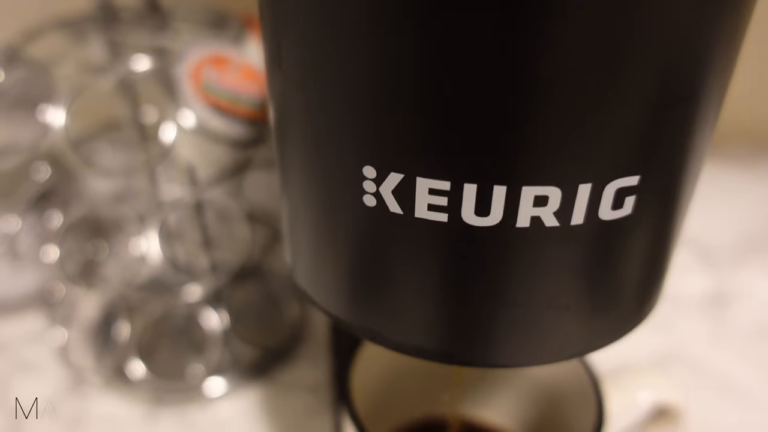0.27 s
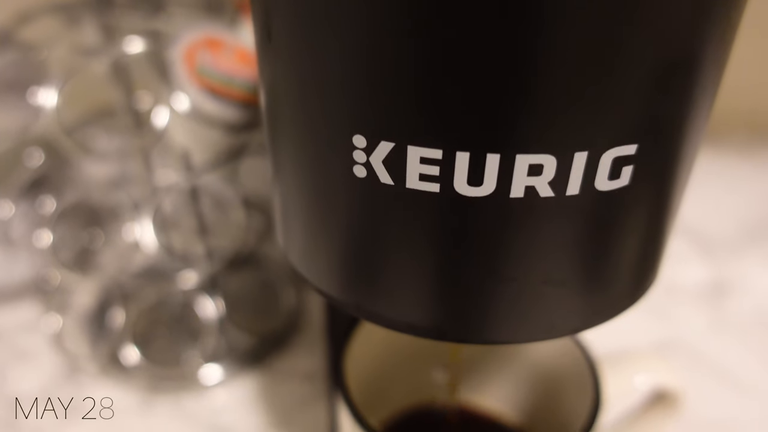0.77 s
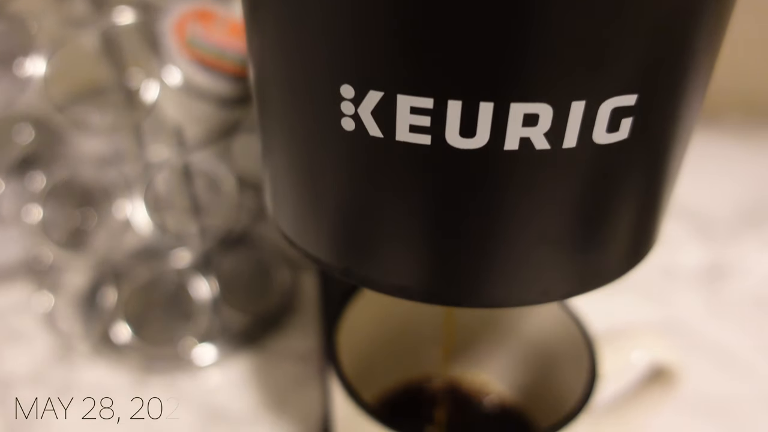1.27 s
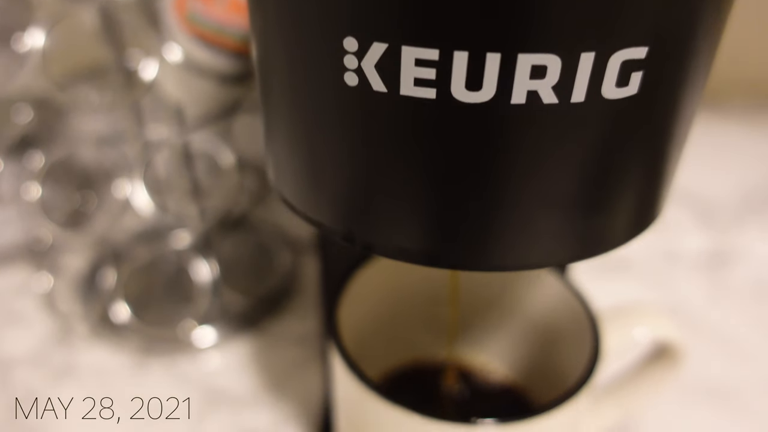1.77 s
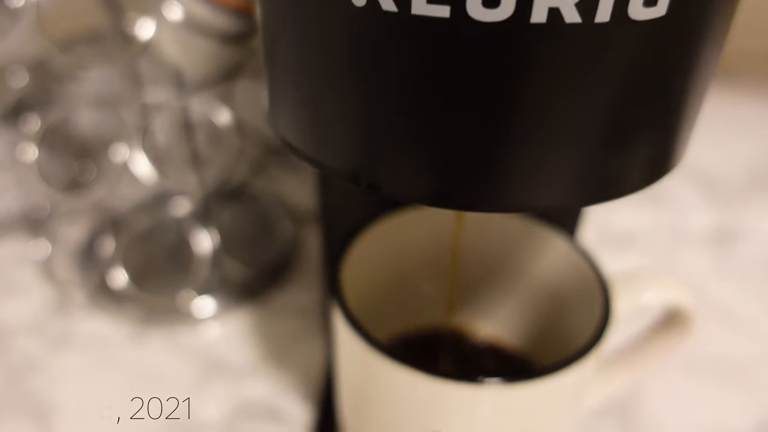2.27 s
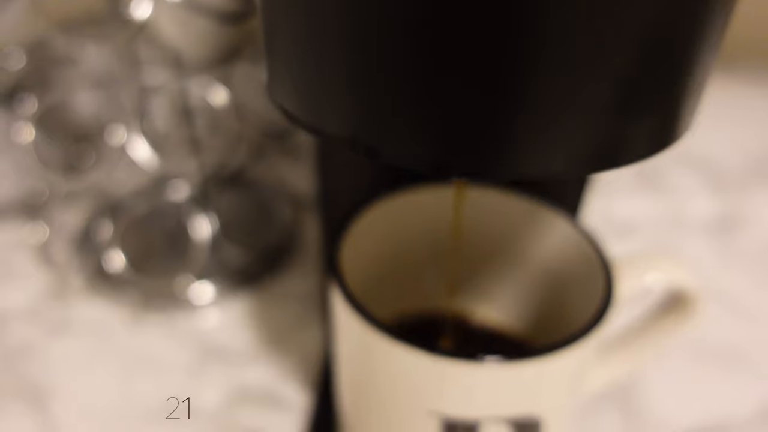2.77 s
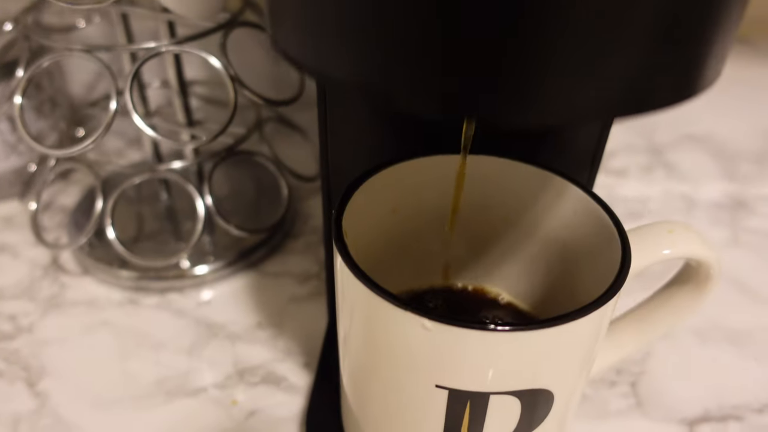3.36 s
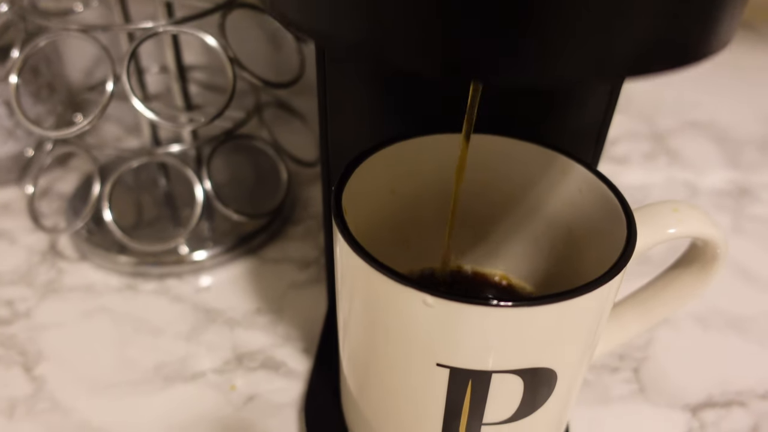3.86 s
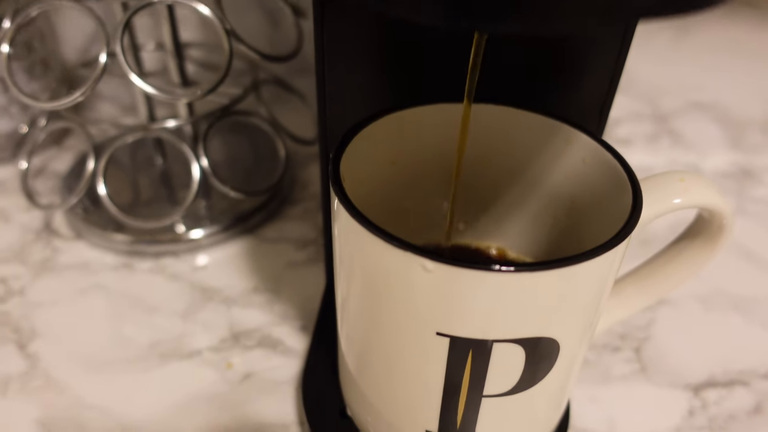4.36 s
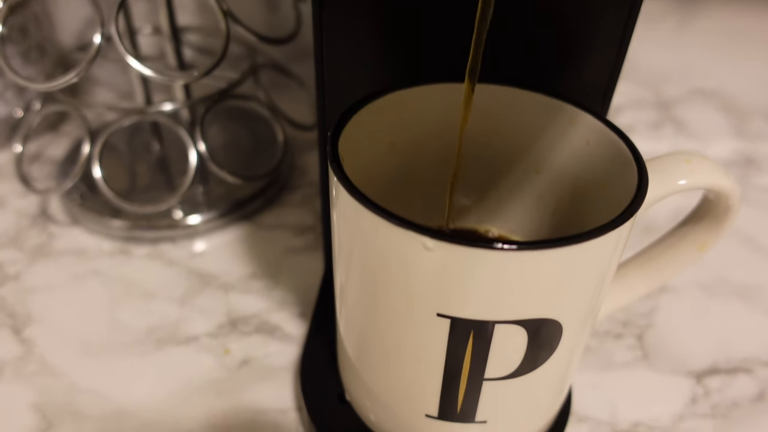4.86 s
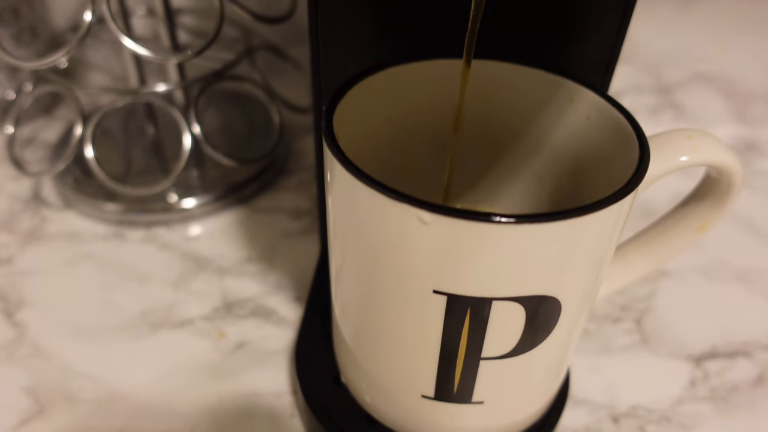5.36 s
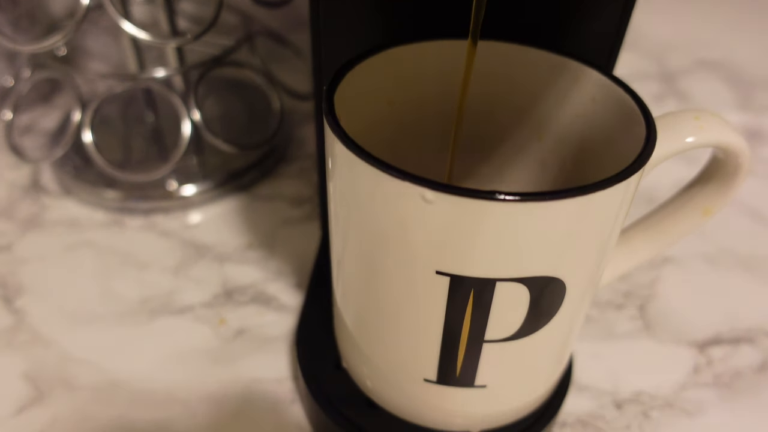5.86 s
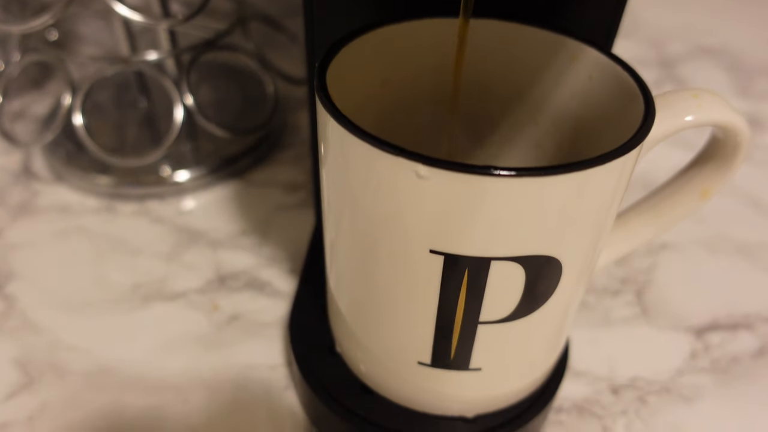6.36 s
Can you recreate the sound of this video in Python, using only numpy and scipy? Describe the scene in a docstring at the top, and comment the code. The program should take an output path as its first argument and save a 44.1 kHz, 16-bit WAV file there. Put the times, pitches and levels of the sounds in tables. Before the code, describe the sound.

From 0 s, a thin coffee stream is already running into a ceramic mug, close and nearly central. Irregular, quick plops ring hollowly around 900 Hz, mixed with gurgles, higher pips, crisp spray ticks and fine fizz. The machine surrounds them with a motor hum, low rush, throbbing steamy hiss and a buzzing pump whine near 4.4 kHz, pulsing roughly 175 times a second. The whine grows by 1.2 s; hiss falls sharply from about 1.4 to 2.2 s, and hum softens through 3.5 s as the microphone descends. A stronger plop lands near 2.45 s. The whine is strong around 3.0-3.4 s, then sputters, with a brief return near 4.4-4.6 s and a prominent plop at 4.65 s. From 5 s it is mostly weak, flickering and faster. Small splashes and faint ceramic taps continue among thinner gurgles until the cut at 6.6 s, still pouring, with slight kitchen reverberation.

```python
"""On a kitchen counter, a coffee machine runs a thin stream into a ceramic mug.
Bubbles trapped by the stream are rising sines that plop in the resonant hollow of the mug.
Small pips are sines too; ticks and taps on the wall are filtered noise, splashes clusters of tiny bubbles.
The pump whines in one short tone per stroke over a buzz of clicks and puffs; a hum of motor tones
and a hiss of filtered noise recede as the microphone moves down to the mug."""
import sys
import numpy as np
from scipy import signal
from scipy.fft import rfft, irfft, next_fast_len
from scipy.io import wavfile

SR = 44100
rng = np.random.default_rng(int(sys.argv[2]) if len(sys.argv) > 2 else 0)


def put_to_file(sound):
    """Save the sound as 16-bit audio at rate SR, in the file named by the first command-line argument."""
    columns = np.atleast_2d(sound).T  # one column per channel
    safe = np.clip(columns, -1, 1)
    whole_steps = np.round(safe * 32767)
    wavfile.write(sys.argv[1], SR, whole_steps.astype(np.int16))


N = 292368
TIME = np.arange(N) / SR
MUG_HZ, MUG_WIDTH_HZ = 907.4, 58  # the air in the mug

# Hiss dropping as the microphone passes below the brew head; the pump's puffs follow it.
# Each row: time in seconds, relative level in dB.
HISS_FADE = [(0, -47), (1.4, -45.5), (2.15, -56), (3.5, -61), (6.63, -60.5)]


def amp(db):
    """Turns dB into an amplitude factor."""
    return 10 ** (np.asarray(db) / 20)


def unit(x):
    """Scales a sound to rms 1."""
    return x / np.sqrt(np.mean(x ** 2) + 1e-20)


def crest(x):
    """Scales a sound to a peak of 1."""
    return x / (abs(x).max() + 1e-20)


def curve(rows):
    """Joins (seconds, value) points by straight lines."""
    return np.interp(TIME, *np.transpose(rows))


def read(points, hz):
    """Reads a (Hz, value) table along a logarithmic frequency axis."""
    f, value = np.transpose(points)
    return np.interp(np.log(hz + 1), np.log(f + 1), value)


def colour(x, spectrum):
    """Filters a sound by a (Hz, dB) table, then scales it to rms 1."""
    gain = amp(read(spectrum, np.fft.rfftfreq(N, 1 / SR)))
    return unit(irfft(rfft(x) * gain, N))


def drift(per_s):
    """Random wander of rms 1, mostly slower than per_s cycles per second."""
    size = next_fast_len(N)
    f = np.fft.rfftfreq(size, 1 / SR)
    smooth = rfft(rng.standard_normal(size)) * np.exp(-(f / per_s) ** 2)
    return unit(irfft(smooth, size)[:N])


def add(mix, s, sound):
    """Lays a sound into the mix at s seconds, cut off at the end."""
    part = mix[max(round(s * SR), 0):][:len(sound)]
    part += sound[:len(part)]


def resonate(x, hz, width_hz):
    """A two-pole resonance of gain 1."""
    r = np.exp(-np.pi * width_hz / SR)
    poles = [1, -2 * r * np.cos(2 * np.pi * hz / SR), r * r]
    return signal.lfilter([1, 0, -1], poles, x) * (1 - r * r) / 2


def pump_motion(weak_sputter=0.088, sputter_db=1.13, sputter_per_s=25, speed_wander=.004, wander_per_s=12):
    """The pump's strokes per second and its whine level in dB, which flutters more when the whine is weak."""
    # Pump speed, mostly faster where its load eases and the whine fades.
    # Each row: time in seconds, strokes per second.
    stroke_rate = [(0, 174.5), (.55, 177), (.9, 169.3), (2.1, 170), (3.45, 173), (3.7, 181), (3.98, 185),
                   (4.25, 179), (4.58, 175), (4.93, 185), (5.04, 183), (5.3, 188.5), (5.53, 189),
                   (5.63, 194.5), (5.78, 194), (5.97, 179), (6.1, 182), (6.17, 190), (6.63, 189.5)]
    # Strength of the whine. Each row: time in seconds, relative level in dB.
    whine_strength = [(0, -41.5), (.35, -41), (.55, -37.5), (1.25, -34), (2.2, -36.5), (2.8, -35.5),
                      (3.02, -32.5), (3.36, -33), (3.5, -41), (3.63, -37), (3.9, -40.5), (4.02, -50.5),
                      (4.12, -41), (4.2, -44), (4.4, -35), (4.635, -36), (4.67, -48), (4.77, -45),
                      (4.8, -39), (4.83, -44.5), (4.95, -52.5), (5.5, -53.5), (5.59, -43), (5.72, -56),
                      (5.87, -42.5), (5.91, -46), (5.98, -39.5), (6.08, -49), (6.29, -54.5), (6.36, -47),
                      (6.42, -56), (6.48, -42), (6.56, -53.5), (6.63, -39.5)]
    rate = curve(stroke_rate) * (1 + speed_wander * drift(wander_per_s))
    effort_db = curve(whine_strength)
    depth_db = sputter_db * (.5 + weak_sputter * (effort_db.max() - effort_db))
    return rate, effort_db + depth_db * drift(sputter_per_s)


def whine(rate, effort_db, whine_db=-2.5, swell_s=0.00036, scatter=0.021, uneven_db=2.0,
          slip_s=0.00006, size=400):
    """Each pump stroke lets out a rounded tone a few milliseconds long, each at a slightly different pitch."""
    # Centre pitch of the stroke tones. Each row: time in seconds, pitch in Hz.
    stroke_pitch = [(0, 4346), (3.36, 4413), (3.5, 4460), (3.66, 4300), (3.9, 4450), (4.45, 4430),
                    (4.6, 4600), (4.75, 4460), (4.88, 4540), (5.25, 4040), (5.6, 4630), (5.85, 4470),
                    (5.98, 4440), (6.14, 3960), (6.25, 4330), (6.63, 4470)]
    turns = np.cumsum(rate) / SR
    strokes = np.interp(np.arange(1, int(turns[-1])), turns, TIME)
    pitches = np.interp(strokes, *np.transpose(stroke_pitch))
    variations = rng.standard_normal((len(strokes), 3))
    out = np.zeros(N)
    for s, hz, (detune, force, slip) in zip(strokes, pitches, variations):
        # time since the slightly mistimed stroke, finer than one sample
        t = np.maximum((round(s * SR) + np.arange(size)) / SR - s - slip_s * slip, 0)
        swell = (t / swell_s) ** 4 * np.exp(-t / swell_s)
        pulse = swell * np.sin(2 * np.pi * hz * (1 + scatter * detune) * t)
        add(out, s, amp(uneven_db * force) * pulse)
    return unit(out) * amp(effort_db + whine_db)


def buzz(rate, effort_db, buzz_db=-48.0, puff_turns=0.14, roughness=.35, buzz_follow=0.46,
         pipe_db=-4, pipe_hz=2750, pipe_width_hz=110):
    """The strokes also shake the housing, each with a click and a puff of air that sounds a narrow pipe."""
    # Colour of the shaking housing. Each row: frequency in Hz, relative level in dB per Hz.
    housing = [(60, -33), (170, -55), (350, 8), (520, 4), (900, -19), (1600, 4.5), (2080, 14.5), (2400, -2),
               (3150, 14), (3500, 11), (3900, 13.5), (5300, 9.5), (6100, -10.5), (15000, -27)]
    turns = np.cumsum(rate) / SR
    offset = ((turns + .5) % 1 - .5) * SR / rate  # samples from the nearest stroke
    clicks = unit(np.sinc(offset) * np.exp(-(offset / 8) ** 2))
    puffs = unit(rng.standard_normal(N) * np.exp(-(turns % 1) / puff_turns))
    pipe = unit(resonate(resonate(puffs, pipe_hz, pipe_width_hz), pipe_hz, 730))
    shake = colour(clicks + roughness * puffs, housing)
    shake_db = buzz_db + buzz_follow * (effort_db - effort_db.mean())
    return shake * amp(shake_db) + pipe * amp(curve(HISS_FADE) + pipe_db)


def reflect(x):
    """The drip tray and the mug throw the machine's noise straight back."""
    # Close reflections. Each row: delay in seconds, level in dB against the direct sound.
    near_echoes = [(.00077, -29), (.002115, -10)]
    f = np.fft.rfftfreq(N, 1 / SR)
    echoes = sum(amp(db) * np.exp(-2j * np.pi * f * s) for s, db in near_echoes)
    return irfft(rfft(x) * (1 + echoes), N)


def tone(hz, db, waver_db=2.5, waver_turns=0.048):
    """A motor tone that wavers a little in pitch and strength."""
    level = np.sqrt(2) * amp(db + waver_db * drift(1.86))
    return level * np.sin(2 * np.pi * (hz * TIME + waver_turns * drift(1.3) + rng.random()))


def motor(hum_db=-0.5, drone_db=3.0, shadow_hz=4000, swell_db=2.0, held_tone_hz=626.2):
    """Wavering tones over a low rush, fading with distance; high hum fades more, shadowed by the machine."""
    # Motor level at the microphone as it moves away. Each row: time in seconds, relative level in dB.
    distance_fade = [(0, -42), (1.2, -43), (1.7, -45), (2.2, -45), (3.5, -51), (4.3, -50), (6.63, -53)]
    # Motor tones. Each row: frequency in Hz, relative level in dB.
    hum_tones = [(156.7, -55.5), (192.6, -60.5), (246, -56.5), (261.5, -56), (522.3, -58.5), (574.8, -58),
                 (679, -53.5), (731, -60), (940.3, -51), (1045, -67), (1254, -69), (1306.4, -53),
                 (1358.4, -50), (1410.8, -50), (1463, -58), (1587.8, -53.5), (1933.3, -53), (1985.5, -54.5)]
    # Colour of the rush under the hum. Each row: frequency in Hz, relative level in dB per Hz.
    rush_colour = [(20, -53), (70, -96), (108, -13), (130, -8.5), (215, -5), (250, -7.5), (330, 2.5),
                   (430, -5.5), (700, -2), (1150, 0.5), (1700, -3), (2300, -7), (4000, -7), (16000, -140)]
    # A motor tone near 626 Hz that holds its level until the microphone is down by the mug.
    # Each row: time in seconds, relative level in dB.
    held_tone_fade = [(0, -53.5), (2, -53.5), (3.8, -54), (4.7, -61.5), (6.63, -66.5)]
    near_db = curve(distance_fade)
    fade_db = near_db - near_db[:SR].mean()  # against the first second
    hum = sum(tone(hz, db + hum_db + fade_db * (1 + hz / shadow_hz)) for hz, db in hum_tones)
    rush_db = near_db + drone_db + swell_db * drift(21)
    rush = colour(rng.standard_normal(N), rush_colour) * amp(rush_db)
    return hum + tone(held_tone_hz, curve(held_tone_fade)) + rush


def hiss(rate, hiss_db=7, flutter_db=1, throb=.6, throb_lag_turns=0.31):
    """Air and steam escape through the cavities of the brew head, throbbing with the pump's strokes."""
    # Ringing cavities. Each row: centre in Hz, width in Hz, gain of the added ring in dB.
    cavities = [(2787, 80, 11), (3090, 80, 15.5), (4480, 165, 9), (5150, 66, 3.5), (6580, 59, 1),
                (7860, 150, 8.5), (8970, 340, 7), (12300, 200, -14)]
    # Colour of the hiss, laid over the ringing. Each row: frequency in Hz, relative level in dB per Hz.
    air_colour = [(600, -17), (2200, -8), (2900, -3.5), (3450, -16.5), (4500, 2.5), (5800, 1.5),
                  (9000, -13), (11800, -15), (13500, -23.5), (16000, -27)]
    turns = np.cumsum(rate) / SR
    pulse = np.exp(throb * np.cos(2 * np.pi * (turns - throb_lag_turns)))
    air = rng.standard_normal(N) * pulse
    ringing = air + sum(amp(db) * resonate(air, hz, width) for hz, width, db in cavities)
    return colour(ringing, air_colour) * amp(curve(HISS_FADE) + hiss_db + flutter_db * drift(55))


def bubble(hz, t60, rise, attack_s, size=4000):
    """A sine that swells quickly and dies; its pitch climbs as the bubble nears the surface."""
    t = np.arange(size) / SR
    age = np.minimum(t / t60, 2)
    sine = np.sin(2 * np.pi * np.cumsum(hz * (1 + rise * age)) / SR)
    return sine * np.exp(-np.log(1000) * t / t60) * (1 - np.exp(-t / attack_s))


def plop(hz, t60, rise, direct=0.023):
    """A large bubble rings the air in the mug, whose pitch shifts a little as the surface heaves."""
    mug_hz = MUG_HZ * (1 + rng.uniform(-.022, .014))
    ring = bubble(hz, t60, rise, attack_s=0.00068)
    return crest(resonate(ring, mug_hz, MUG_WIDTH_HZ) + direct * ring)


def tick(hz, t60=0.0088, width_hz=800, skirt_hz=4500, attack_s=0.000044, size=4000):
    """A droplet's spatter: a noise burst coloured by the tiny bubble that it leaves."""
    t = np.arange(size) / SR
    hz = min(hz, SR / 2.2)
    envelope = np.exp(-np.log(1000) * t / t60) * (1 - np.exp(-t / attack_s))
    burst = rng.standard_normal(size) * envelope
    return crest(resonate(resonate(burst, hz, width_hz), hz, skirt_hz))


def pour(plop_db=0, pip_db=1, tick_db=0, tink_db=4.0, pip_rise=0.043, wet_db=-12, slosh_db=-21,
         snap_db=-25, smack_db=-6, mist_db=-9, wall_hz=5470, wall_t60_s=0.05):
    """The distinct plops, pips and ticks of the stream, each with a little spatter, and taps on the mug wall."""
    # Large bubbles that stand out. Each row: start in seconds, relative level in dB,
    # starting pitch in Hz, bubble's 60 dB decay in seconds.
    large_bubbles = [(0.1003, -18.5, 830, 0.011), (0.1312, -22, 1270, 0.013), (0.2476, -22, 970, 0.013),
                     (0.2956, -13, 964, 0.023), (0.3254, -15.5, 1160, 0.014), (0.352, -24, 884, 0.025),
                     (0.4267, -22, 970, 0.036), (0.477, -20, 1110, 0.042), (0.5026, -14, 870, 0.05),
                     (0.5169, -34, 820, 0.03), (0.5494, -24, 888, 0.062), (0.583, -20, 954, 0.029),
                     (0.6151, -18, 940, 0.0098), (0.6815, -17, 1050, 0.0081), (0.7233, -21.5, 1290, 0.016),
                     (0.768, -30.5, 930, 0.02), (0.8941, -21.5, 1240, 0.032), (0.9824, -26, 970, 0.035),
                     (1.006, -27, 936, 0.12), (1.034, -16, 940, 0.019), (1.1192, -26.0, 960, 0.031),
                     (1.139, -20.5, 970, 0.012), (1.1605, -27, 945, 0.014), (1.1948, -12.5, 1185, 0.014),
                     (1.2472, -12.5, 930, 0.013), (1.2829, -31, 975, 0.031), (1.3008, -17.5, 905, 0.017),
                     (1.3144, -28, 933, 0.07), (1.3849, -20.5, 900, 0.012), (1.4659, -23.5, 905, 0.025),
                     (1.6169, -15.5, 879, 0.047), (1.6341, -20, 860, 0.033), (1.6962, -17.5, 906, 0.016),
                     (1.7596, -22, 863, 0.05), (1.7916, -14, 960, 0.0092), (1.8875, -27.5, 930, 0.027),
                     (1.912, -26.5, 956, 0.054), (2.0604, -18.5, 953, 0.027), (2.074, -27.5, 940, 0.044),
                     (2.1118, -17, 1250, 0.017), (2.161, -22, 1150, 0.022), (2.1782, -27, 1030, 0.018),
                     (2.2124, -25, 920, 0.012), (2.2833, -23, 1436, 0.042), (2.452, -10, 1150, 0.02),
                     (2.4947, -25, 1143, 0.011), (2.5301, -27.5, 945, 0.094), (2.5501, -18, 907, 0.12),
                     (2.5637, -20.5, 844, 0.029), (2.7222, -23.5, 1080, 0.0074), (2.8203, -20, 858, 0.016),
                     (2.8482, -19.5, 844, 0.0091), (2.8592, -21, 1090, 0.019), (2.9185, -25, 970, 0.0083),
                     (2.9824, -17, 985, 0.0091), (3.033, -32, 920, 0.0055), (3.1937, -29, 920, 0.02),
                     (3.2222, -23.5, 1150, 0.026), (3.2769, -20.5, 933, 0.024), (3.453, -31, 890, 0.017),
                     (3.488, -27, 870, 0.0069), (3.5211, -17, 1210, 0.028), (3.586, -17.5, 1150, 0.015),
                     (3.6776, -21.0, 910, 0.019), (3.7405, -23.0, 1180, 0.023), (3.8167, -16, 1126, 0.022),
                     (3.8728, -15.5, 885, 0.024), (3.9076, -26, 933, 0.12), (3.9303, -21.5, 927, 0.075),
                     (3.9578, -21, 1095, 0.03), (4.1072, -22.5, 820, 0.026), (4.1358, -25, 880, 0.015),
                     (4.1951, -24.5, 944, 0.11), (4.2758, -18, 980, 0.014), (4.2894, -25, 830, 0.016),
                     (4.3114, -18.5, 822, 0.04), (4.325, -29, 1030, 0.0099), (4.3454, -16.5, 898, 0.032),
                     (4.359, -31, 1050, 0.021), (4.3714, -18, 1090, 0.0082), (4.3865, -24.5, 924, 0.16),
                     (4.4152, -18, 900, 0.0096), (4.4883, -17.5, 850, 0.015), (4.5059, -23, 915, 0.046),
                     (4.5265, -21.5, 895, 0.059), (4.6522, -7, 1055, 0.011), (4.6669, -27, 960, 0.038),
                     (4.6989, -22.5, 933, 0.11), (4.7344, -30, 861, 0.084), (4.8918, -16.5, 934, 0.089),
                     (4.9155, -21, 931, 0.11), (4.9328, -25, 855, 0.087), (4.9482, -19.5, 1080, 0.03),
                     (4.9659, -12, 940, 0.011), (5.057, -25, 870, 0.014), (5.128, -30, 915, 0.048),
                     (5.2039, -26.5, 1120, 0.043), (5.3355, -22.5, 1027, 0.046), (5.307, -30, 1390, 0.025),
                     (5.3818, -28, 974, 0.1), (5.4035, -23, 860, 0.022), (5.4565, -22.5, 1330, 0.018),
                     (5.5288, -17.5, 866, 0.022), (5.5574, -28.5, 915, 0.043), (5.7203, -18, 1110, 0.021),
                     (5.7376, -20.5, 1160, 0.04), (5.8649, -27.5, 820, 0.033), (5.976, -31, 885, 0.016),
                     (6.136, -27, 1230, 0.031), (6.1571, -28, 1050, 0.05), (6.3642, -14.5, 1035, 0.015),
                     (6.5173, -14, 1170, 0.018), (6.5377, -14.5, 1027, 0.022), (6.5513, -31, 958, 0.13)]
    # Small bubbles. Each row: time in seconds, relative level in dB, starting pitch in Hz,
    # bubble's 60 dB decay in seconds.
    small_bubbles = [(0.25, -30.5, 2730, 0.077), (.429, -31, 3000, 0.014), (.584, -27.5, 2000, 0.018),
                     (1.162, -28.5, 2930, 0.02), (1.362, -26, 2940, 0.02), (1.367, -34, 3300, .02),
                     (1.791, -33, 2670, 0.043), (2.032, -31.5, 2030, 0.015), (2.214, -28.5, 2860, 0.02),
                     (2.921, -33, 2520, 0.016), (2.9621, -18.5, 2650, 0.026), (2.968, -17, 2840, 0.018),
                     (3.199, -25.5, 3520, 0.01), (3.254, -29, 3040, 0.011), (3.392, -26.5, 3700, 0.013),
                     (3.425, -27, 2800, 0.019), (3.5213, -29, 2000, 0.019), (3.523, -32, 3100, 0.013),
                     (3.553, -28.5, 3000, 0.015), (3.679, -21, 3100, 0.0084), (3.685, -26.5, 3570, 0.012),
                     (3.873, -30.5, 1970, 0.015), (3.958, -35.5, 2100, 0.019), (4.016, -38, 2100, 0.021),
                     (4.108, -35.5, 2990, .015), (4.2066, -28.5, 3130, 0.016), (4.4023, -30, 2860, 0.03),
                     (4.742, -28, 2980, 0.016), (5.091, -31, 4130, 0.021), (5.098, -28.5, 5360, 0.03),
                     (5.457, -31.5, 2170, 0.018), (5.461, -31, 2350, 0.028), (5.471, -45, 2720, 0.022),
                     (5.491, -35, 2760, 0.025), (6.158, -36, 3130, 0.02), (6.159, -34, 3870, 0.017),
                     (6.3931, -33.5, 3160, 0.018), (6.476, -24.5, 3060, 0.013), (6.4906, -26, 3100, 0.015),
                     (6.493, -33, 1320, 0.017), (6.5, -33, 2820, 0.016), (6.5138, -33, 3080, 0.025),
                     (6.5152, -27, 1350, 0.0099)]
    # Larger drops of spray. Each row: start in seconds, relative level in dB, centre in Hz.
    spray_drops = [(0.123, -30, 8600), (0.326, -25, 8000), (0.4773, -19, 4900), (0.68, -21.5, 4960),
                   (.829, -33, 10900), (0.894, -30, 6540), (.958, -28, 6960), (.984, -31, 9200),
                   (1.161, -22, 4940), (1.162, -35, 10800), (1.2404, -16.5, 6200), (1.256, -23, 7440),
                   (1.4142, -25.5, 7500), (1.53, -29.5, 9300), (1.566, -32, 12000), (1.831, -30, 6300),
                   (2.017, -18, 5650), (2.324, -40, 11600), (2.404, -37, 10300), (2.482, -27, 5100),
                   (2.484, -38, 9800), (2.791, -39, 10700), (2.972, -40, 10600), (3.74, -39, 13300),
                   (3.872, -27, 11700), (3.958, -38, 14350), (4.0069, -36.5, 9900), (4.165, -27, 8100),
                   (4.4067, -33, 7050), (5.023, -30.5, 7940), (5.057, -39.5, 11000), (5.2035, -31, 12400),
                   (5.308, -32, 10700), (5.571, -22, 7800), (5.656, -27, 8100), (5.996, -35, 13610),
                   (6.159, -31.5, 6000), (6.3034, -30.5, 9000), (6.589, -34, 7560)]
    # Drops that strike the mug wall. Each row: start in seconds, relative level in dB.
    wall_drops = [(1.79, -33), (1.934, -35), (2.076, -37), (2.106, -37), (2.193, -35.5), (2.283, -34),
                  (3.201, -36.5), (3.254, -38), (3.354, -41), (3.521, -40), (4.3117, -33.5), (4.866, -43),
                  (5.121, -39), (5.337, -48), (5.897, -41), (6.408, -44)]
    out = np.zeros(N)
    for s, db, hz, t60 in large_bubbles:
        slosh = tick(1.17 * hz, t60=0.23, width_hz=170, skirt_hz=2470)
        snap = tick(0.6 * hz, t60=0.13, width_hz=720, skirt_hz=2500)
        snap = snap * (hz / MUG_HZ) ** 3  # shriller bubbles pinch off harder
        wet_plop = plop(hz, t60, rise=0.047) + amp(slosh_db) * slosh + amp(snap_db) * snap
        add(out, s, amp(db + plop_db) * wet_plop)
    for s, db, hz, t60 in small_bubbles:
        pip = crest(resonate(bubble(hz, t60, pip_rise, attack_s=0.001), hz, width_hz=1000))
        spatter = tick(hz, t60=0.18, width_hz=81, skirt_hz=2500)
        add(out, s - .001, amp(db + pip_db) * (pip + amp(wet_db) * spatter))
    for s, db, hz in spray_drops:
        smack = tick(2600, t60=0.1, width_hz=10400, skirt_hz=3000)
        smack = smack * (5400 / hz) ** 3  # big, low drops also smack the surface
        # finer droplets fall back just after
        mist = tick(0.993 * hz, t60=0.058, width_hz=690, skirt_hz=5000, attack_s=0.0014)
        add(out, s, amp(db + tick_db) * (tick(hz) + amp(smack_db) * smack + amp(mist_db) * mist))
    for s, db in wall_drops:
        # the damped ring of the ceramic
        ceramic = tick(wall_hz, t60=wall_t60_s, width_hz=150, skirt_hz=7000)
        add(out, s, amp(db + tink_db) * ceramic)
    return out


def gurgles(gurgle_db=-31.5, spread_db=3.0, fade_db_per_s=1.26, lowest_hz=760, pitch_span=2.134,
            t60=0.033, direct=0.011, count=260):
    """Lesser bubbles plop at random, growing softer as the mug fills."""
    out = np.zeros(N)
    sizes = np.minimum(rng.standard_normal(count), 1.8)
    for k, (when, pitch) in enumerate(rng.random((count, 2))):
        s = (k + when) / count * N / SR  # one at random in each equal slot
        db = gurgle_db - fade_db_per_s * s + spread_db * sizes[k]
        add(out, s, amp(db) * plop(lowest_hz * pitch_span ** pitch, t60, rise=0.3, direct=direct))
    return out


def droplets(db, spread_db, fade_db_per_s, low_hz, high_hz, t60, count, flurries_per_s=15):
    """Tiny bubbles ring at random, each with its own level and pitch, louder in flurries as the stream wobbles."""
    out = np.zeros(N)
    flurry = drift(flurries_per_s)
    for when, pitch in rng.random((count, 2)):
        s = when * N / SR
        force = min(flurry[int(when * N)] + .5 * rng.standard_normal(), 2)
        size_db = db - fade_db_per_s * s + spread_db * force
        hz = low_hz + (high_hz - low_hz) * pitch
        add(out, s, amp(size_db) * bubble(hz, t60, rise=.02, attack_s=0.00056))
    return out


def trickle():
    """Faint gurgles, drips, spray and fizz between the distinct ones, all made of small ringing bubbles."""
    drips = droplets(db=-41, spread_db=7.0, fade_db_per_s=0.0, low_hz=1200, high_hz=3390, t60=0.0156, count=140)
    spray = droplets(db=-47.5, spread_db=3.5, fade_db_per_s=0.3, low_hz=6600, high_hz=10270,
                     t60=0.0076, count=500)
    fizz = droplets(db=-54.5, spread_db=4.5, fade_db_per_s=-0.5, low_hz=10200, high_hz=15400,
                    t60=0.0076, count=800)
    return gurgles() + drips + spray + fizz


def splashes(bubbles_per_s=380, pitch_spread=0.17, spread_db=3.0, t60=.006, size=60):
    """The stream breaks up and throws quick clusters of tiny ringing bubbles, each of about one size."""
    # Each row: start in seconds, length in seconds, relative level of a bubble in dB, centre pitch in Hz.
    clusters = [(3.183, .09, -50, 11600), (3.855, 0.093, -36, 9800), (4.312, 0.11, -46, 11200),
                (4.825, .05, -40, 11600), (5.017, 0.027, -38, 8550), (5.57, 0.079, -44, 7900),
                (5.928, 0.093, -40, 6000), (6.297, .05, -36, 8000)]
    out = np.zeros(N)
    for start, length, db, hz in clusters:
        draws = zip(rng.random(size), *rng.standard_normal((2, size)))
        for k, (when, pitch, force) in enumerate(draws):
            s = (k + when) / bubbles_per_s
            if s < length:
                ring = bubble(hz * np.exp(pitch_spread * pitch), t60, rise=.03, attack_s=0.00063)
                add(out, start + s, amp(db + spread_db * force) * ring)
    return out


def kitchen(x, size=20000):
    """Two unlike short diffuse tails of sparse noise taps, decaying at a rate set by frequency."""
    # Decay of the room. Each row: frequency in Hz, 60 dB decay in seconds.
    room_t60 = [(150, 0.22), (900, 0.18), (3000, 0.18), (8000, 0.046), (15000, 0.19)]
    sparse = rng.standard_normal((2, size)) * (rng.random((2, size)) < .06)
    taps = sparse * (np.arange(size) > .007 * SR)  # silent for the first 7 ms
    hz, t, z = signal.stft(taps, SR, nperseg=256)
    decay = np.exp(-np.log(1000) * t / read(room_t60, hz)[:, None])
    tail = signal.istft(z * decay, SR, nperseg=256)[1]
    return signal.fftconvolve(x[None], tail / np.linalg.norm(tail[0]), axes=1)[:, :N]


def scene(room_db=-12, width_db=-20, echo_db=-21, echo_s=.025):
    """All sources sit near the centre; a wall answers once, and only the room spreads to the sides."""
    rate, effort_db = pump_motion()
    pump = reflect(whine(rate, effort_db) + buzz(rate, effort_db))
    close = pour() + splashes() + trickle() + pump
    close = close + amp(echo_db) * np.interp(TIME - echo_s, TIME, close, left=0)
    steady = motor() + reflect(hiss(rate))
    middle = close + steady + amp(room_db) * kitchen(close)[0]
    side = amp(width_db) * kitchen(close + steady)[1]
    return np.array([middle + side, middle - side]) * amp([[-.3], [.3]])  # left and right trim in dB


def record(dry, low_cut_hz=60, edge_hz=15850):
    """The microphone's low cut and the recorder's band limit."""
    thin = signal.lfilter(*signal.butter(1, low_cut_hz, "high", fs=SR), dry)
    band_limit = signal.firwin(511, edge_hz, window=("kaiser", 9), fs=SR)
    return signal.oaconvolve(thin, band_limit[None], "same")


dry = scene()
out = record(dry)
put_to_file(out)
```